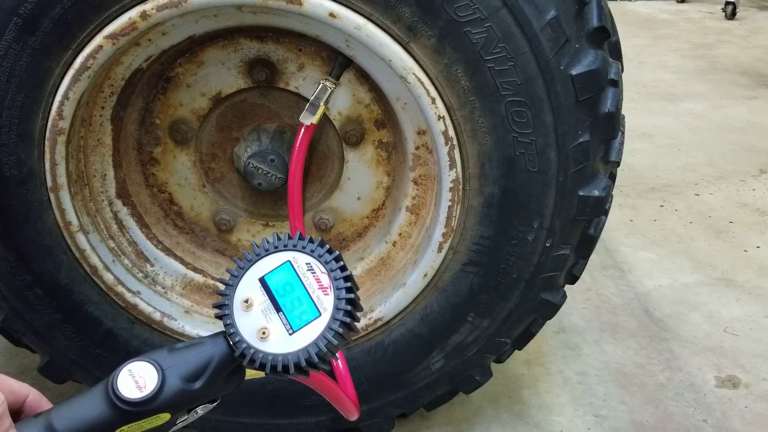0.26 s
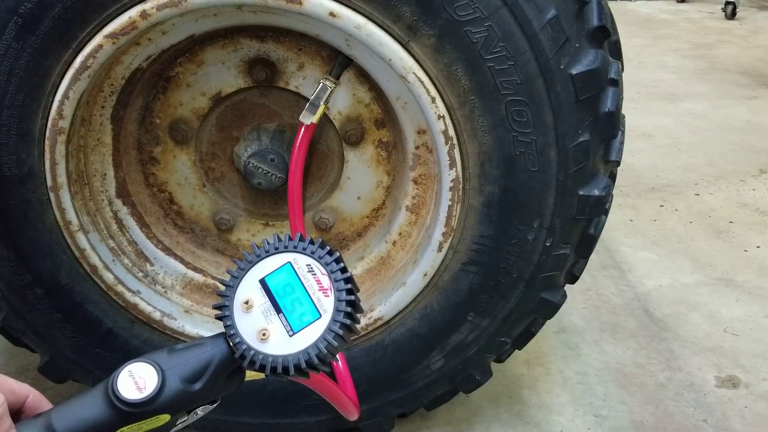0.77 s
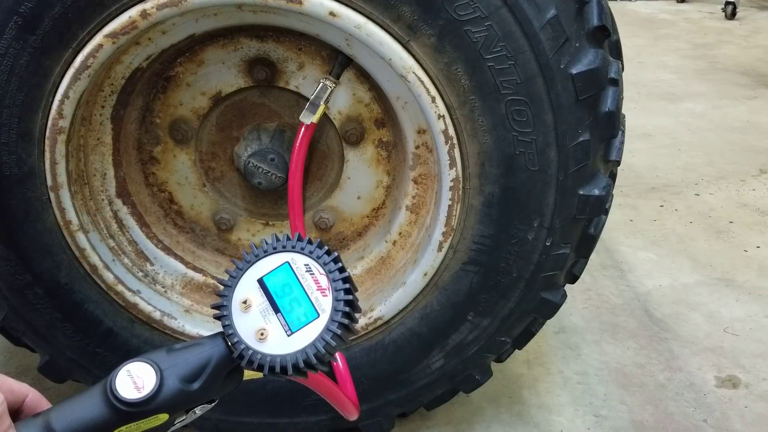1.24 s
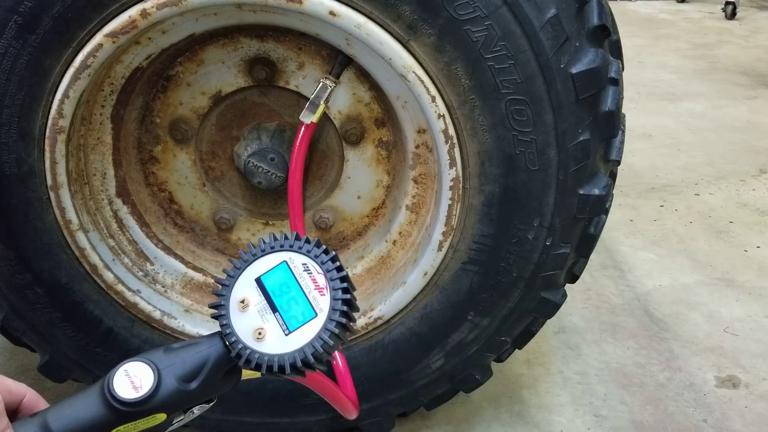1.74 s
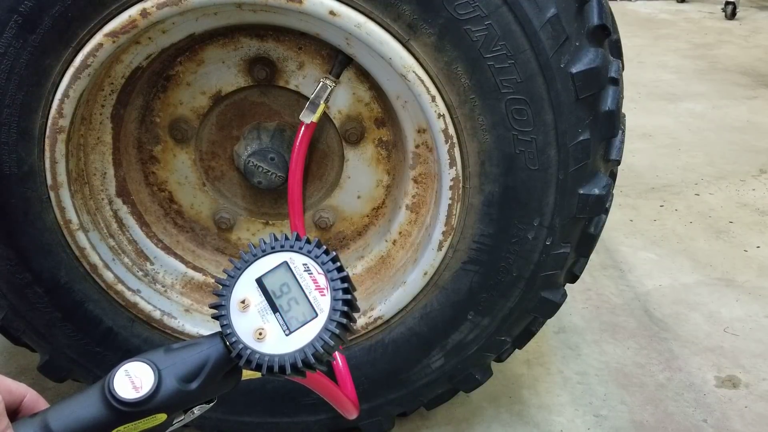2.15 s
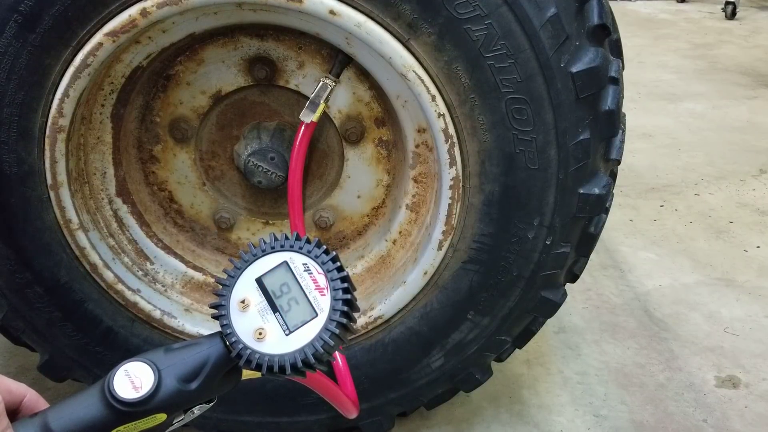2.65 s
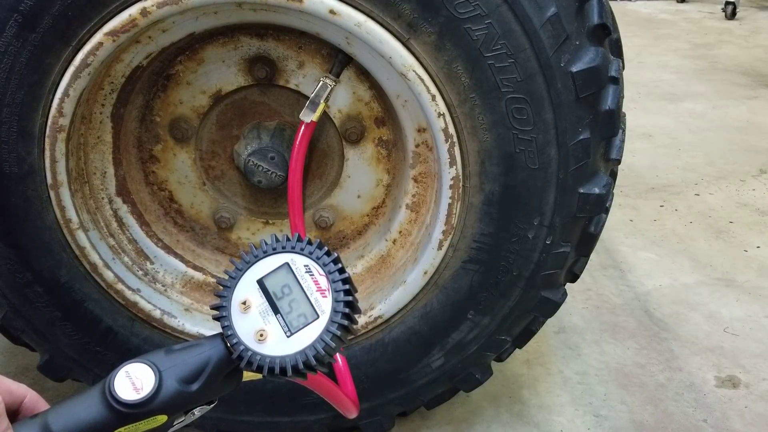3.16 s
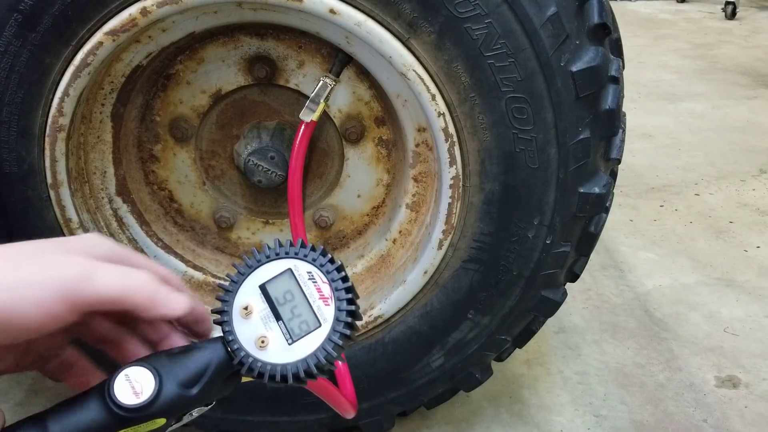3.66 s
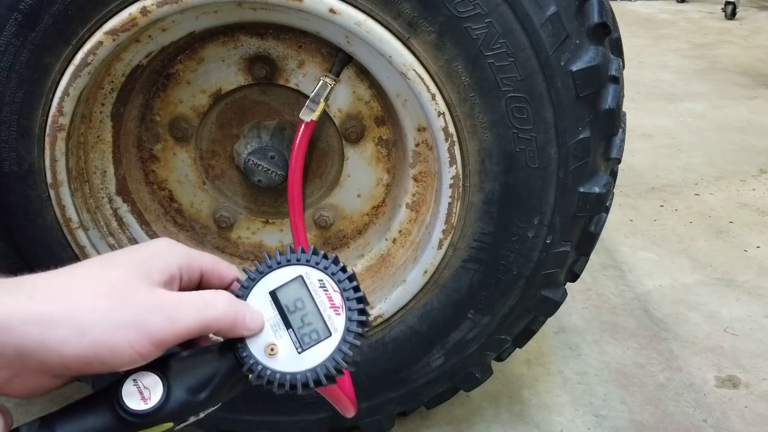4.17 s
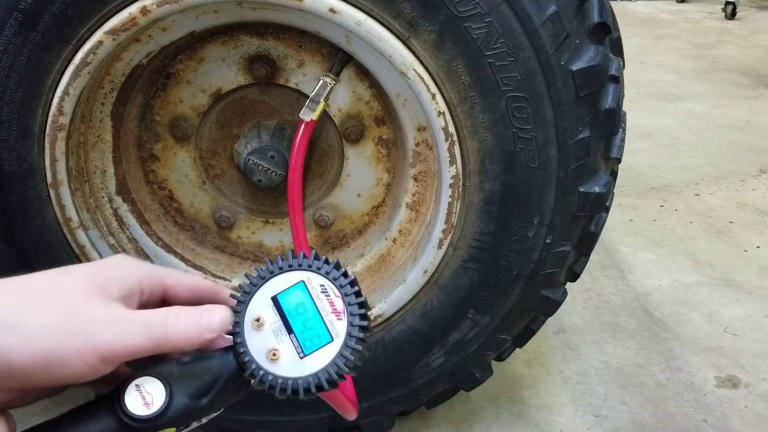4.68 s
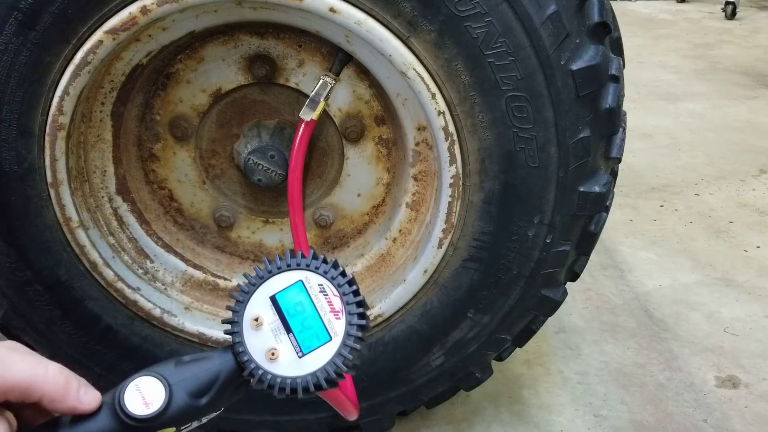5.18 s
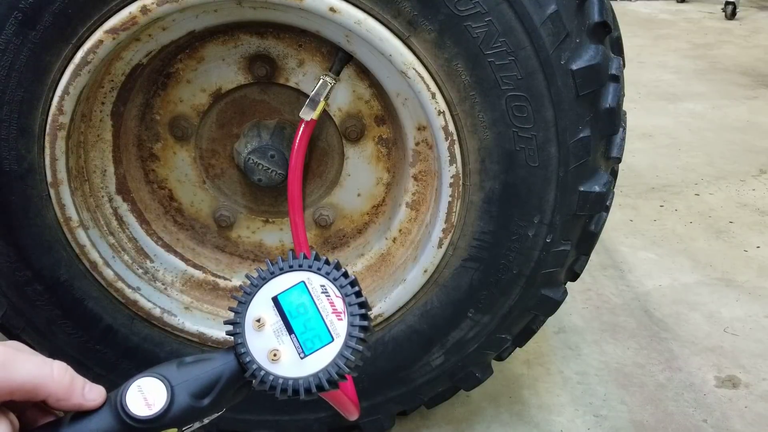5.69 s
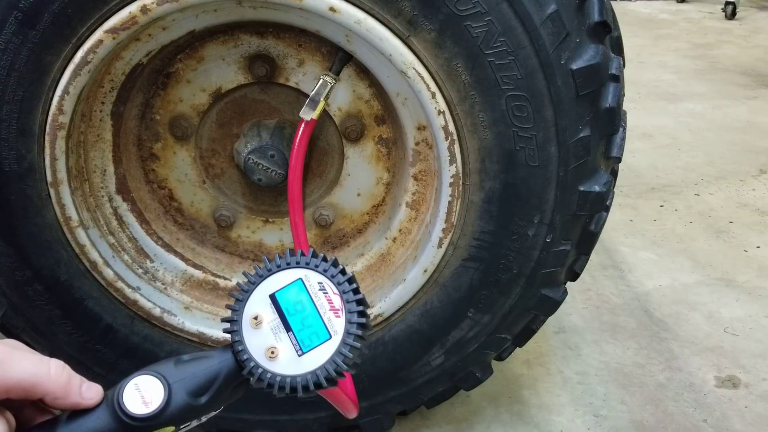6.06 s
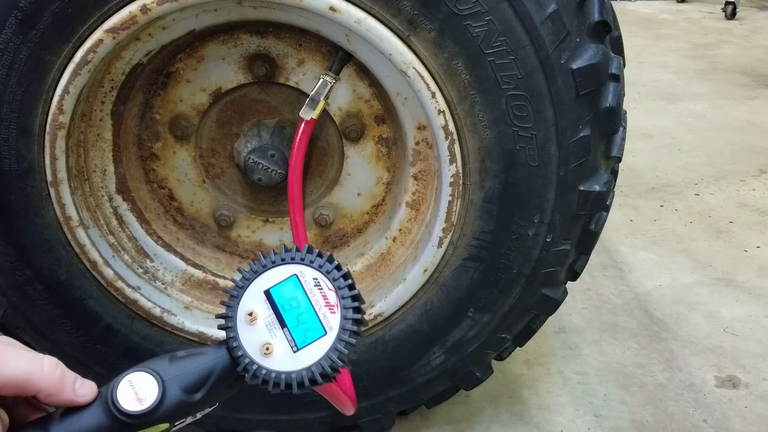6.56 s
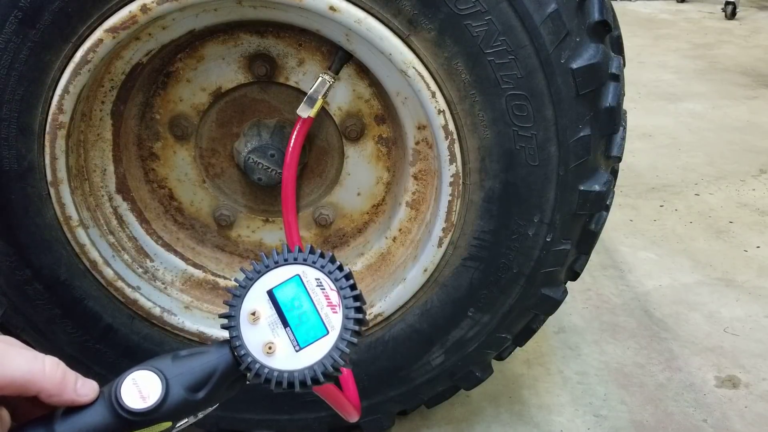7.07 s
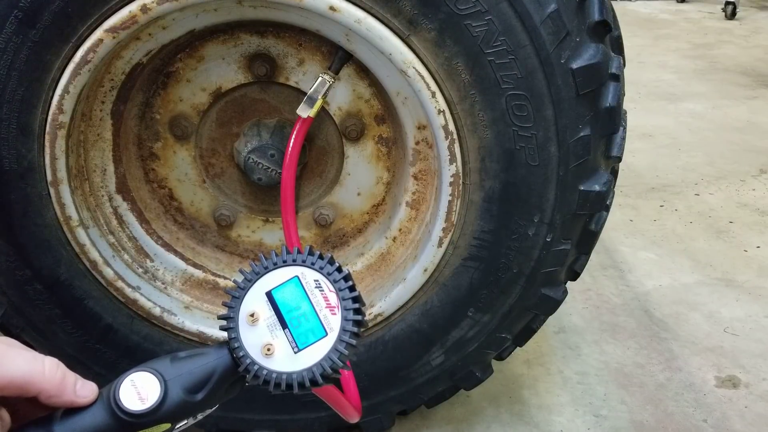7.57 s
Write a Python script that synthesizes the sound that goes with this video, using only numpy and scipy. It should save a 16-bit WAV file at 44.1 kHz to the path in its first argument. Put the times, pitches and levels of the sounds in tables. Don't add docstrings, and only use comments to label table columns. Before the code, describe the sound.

Close stereo pickup of a tire being filled: an even, high airy hiss, wide between left and right, with many soft metallic whistling resonances and very slight sagging in level. Quiet machine drone and electrical hum sit far below. After almost seven seconds the flow stops and the hose vents in one brief, sharp, bright blast with small valve clicks, followed by a diffuse tail in a hard-walled workshop.

```python
import sys
import numpy as np
from scipy import signal
from scipy.fft import rfft, irfft
from scipy.io import wavfile

SR = 44100
rng = np.random.default_rng(int(sys.argv[2]) if len(sys.argv) > 2 else 0)


def natural_amplitude(level_db):
    exponent = np.asarray(level_db, float) / 20
    return 10 ** exponent


def waveform_to_disk(signal):
    frames = np.transpose(np.atleast_2d(signal))
    scaled = np.clip(frames, -1, 1) * 32767
    samples = np.round(scaled).astype(np.int16)
    wavfile.write(sys.argv[1], SR, samples)


N = 345170
TIME = np.arange(N) / SR
HZ = np.arange(N // 2 + 1) * SR / N + 1e-3

# f/Hz, left level/dB, right level/dB
HISS_COLOUR = [(620, -94, -95), (820, -92.5, -93.5), (1400, -91, -93), (1950, -88, -90), (2550, -83, -84.5),
               (3250, -80.5, -83.5), (3800, -69.8, -72.5), (4300, -74.3, -76), (5600, -71.5, -76.5),
               (6500, -68.5, -75.5), (7800, -69, -75.5), (8600, -77.5, -79), (10000, -74.5, -77.5),
               (15500, -72, -79)]
# f/Hz, width/Hz, left rise over hiss/dB, right rise/dB,
# # left-right likeness (-1 to 1)
MODES_BELOW_2K = [(744, 20, 5, 9, 0.5), (878, 40, 10, 10, 0.7), (942, 55, 14, 14, 0.7), (1038, 34, 15, 11, 0.3),
                  (1126, 7, 12, 10, -0.5), (1172, 16, 14, 14, 0.3), (1230, 22, 12, 14, -0.6),
                  (1389, 19, 12, 14, 0), (1569, 19, 18, 15, 0.2), (1639, 16, 20, 20, 0.5),
                  (1719, 10, 17, 17, 0.6), (1755, 27, 16, 15, 0), (1824, 14, 10, 10, 0.1),
                  (1897, 14, 14, 11, -0.2)]
MODES_2K_TO_3K3 = [(2074, 15, 16, 15, 0.5), (2111, 7, 12, 13, 0.2), (2139, 5, 16, 11, 0.5),
                   (2211, 57, 12, 8, 0.2), (2267, 17, 16, 8, 0.3), (2348, 17, 22, 18, -0.1),
                   (2474, 16, 15, 14, 0.5), (2573, 11, 16, 14, 0), (2735, 14, 14, 14, 0.4),
                   (2817, 26, 10, 7, 0.5), (2928, 49, 9, 10, 0.5), (3054, 14, 17, 18, 0.8),
                   (3108, 29, 9, 9, 0.4), (3205, 22, 9, 9, 0.3)]
MODES_3K3_TO_5K8 = [(3355, 37, 7, 10, 0.1), (3403, 16, 15, 12, 0.2), (3438, 17, 10, 9, 0.1),
                    (3482, 14, 5, 12, 0.1), (3577, 39, 7, 6, 0), (3836, 7, 8, 9, 0.2), (3995, 13, 11, 8, 0.7),
                    (4073, 34, 13, 10, 0.6), (4185, 16, 9, 6, 0.4), (4356, 26, 7, 6, 0.3), (4500, 21, 8, 5, -0.2),
                    (5160, 15, 12, 14, 0.3), (5200, 12, 12, 12, 0.4), (5687, 11, 8, 7, 0.5)]
MODES_5K8_TO_8K = [(5858, 14, 7, 8, -0.6), (5995, 25, 10, 8, -0.1), (6105, 25, 8, 2, 0.2),
                   (6481, 77, 9, 5, -0.5), (6544, 105, 9, 4, -0.3), (7111, 30, 7, 3, -0.2),
                   (7197, 14, 12, 4, -0.5), (7437, 26, 8, 3, 0.1), (7599, 19, 1, 9, 0.3), (7842, 97, 5, 3, -0.5),
                   (7921, 24, 6, 9, -0.2), (7961, 15, 7, 10, -0.7)]
MODES_ABOVE_8K = [(8023, 32, 5, 8, -0.5), (8881, 68, 2, 7, 0.1), (9071, 36, 10, 0, -0.3),
                  (9714, 47, 11, 9, -0.6), (9781, 46, 9, 7, -0.4), (10902, 112, 4, 2, 0.3),
                  (11602, 94, 3, 4, 0), (12186, 79, 4, 2, 0.3), (12650, 126, 0, 5, -0.3), (13802, 32, 3, 6, 0),
                  (14992, 44, 6, 0, 0.1)]
# f/Hz, likeness (-1 to 1)
LIKENESS = [(60, 1), (130, 0.97), (290, 0.6), (640, 0.65), (1410, 1), (3100, 0.075), (6820, -0.35),
            (15000, 0.0076)]
# f/Hz, level/dB
VENT_COLOUR = [(35, -60.5), (60, -32), (500, -29), (750, -35), (1000, -28.5), (1750, -23), (2900, -16),
               (3500, -8.5), (4200, -4.5), (5800, -8.5), (7200, -4), (8600, -20), (9800, -3), (15700, -3.5)]
# f/Hz, left over right level/dB
VENT_SIDE = [(60, 7.0), (200, 4.5), (380, 7.2), (1290, 4.0), (2380, 6.0), (4400, 4.5), (7200, 7.5),
             (8600, 1.5), (15000, 10.9)]
# t/s, rise/dB, length/s
SPURTS = [
    (6.803, 2, .002),
    (6.813, 5, .002),
    (6.822, 3, .003),
    (6.87, 3.5, .003),
    (6.897, 2.5, .015),
]
# t/s, peak level/dB, f/Hz, decay/s
KNOCKS = [
    (6.795, -48.5, 80.5, .012),
    (6.863, -52, 218, .010),
    (6.85, -51.5, 480, .012),
]
# f/Hz, time to fall by 60 dB/s, level/dB
ROOM_ECHO = [(125, .9, -15), (500, 0.97, -3), (1000, 0.87, 7), (2000, 0.86, 3.5), (3800, 0.83, -0.5),
             (5250, 0.7, -0.5), (7300, 0.53, -2.5), (8500, 0.5, 1.5), (10000, 0.43, -10),
             (13000, 0.3, -5.5)]
# f/Hz, left level/dB, right level/dB
RUMBLE_COLOUR = [(15, -105, -105), (30, -88.5, -96), (60, -81.5, -86.5), (113, -82, -82),
                 (180.4, -86, -94.5), (400, -110, -114)]
# f/Hz, left level/dB, right level/dB
DRONE_COLOUR = [(100.5, -110, -114), (200, -84, -91), (320, -79, -87), (455, -89, -97.5), (502, -80.5, -81),
                (520, -96, -102), (1205, -115, -115)]
# f/Hz, level/dB
HUM = [(120, -65), (240, -67.5), (360, -72), (480, -75)]

LEVER_SHUT_S, VENT_OPEN_S, SHOP_FADE_OUT_S = 6.8, 6.797, 6.79
FADE_IN_S = 0.46


def filling():
    colour = natural_amplitude(at_hz(HISS_COLOUR)) / np.sqrt(1 + (500 / HZ) ** 8)
    ripple = reflections(ripple_db=2.1 / (1 + (2500 / HZ) ** 4), span_s=.011)
    hiss = colour * ripple * white(at_hz(LIKENESS)[0])
    sound = level_to(hiss + ringing(colour), 1200, 15500)
    sag_db = 0.24 * TIME
    fade_in_db = 4.5 * (1 - ramp(0, FADE_IN_S))
    shut_db = 904 * since(LEVER_SHUT_S)
    flutter_db = 0.13 * drift(7.8) + 0.15 * drift(69.0) + 0.11 * drift(.6)
    return natural_amplitude(-32 - sag_db - fade_in_db - shut_db + flutter_db) * sound


def ringing(colour):
    out = np.zeros((2, len(HZ)), complex)
    shared = .8
    every_mode = MODES_BELOW_2K + MODES_2K_TO_3K3 + MODES_3K3_TO_5K8 + MODES_5K8_TO_8K + MODES_ABOVE_8K + faint_modes(count=16)
    for hz, width, left_db, right_db, alike in every_mode:
        near = slice(*np.searchsorted(HZ, [hz - 12 * width, hz + 12 * width]))
        real, imag = rng.standard_normal((2, 2, near.stop - near.start))
        one, other = (real + 1j * imag) * np.sqrt(N / 2)
        angle = np.arccos(np.clip(alike / shared, -1, 1))
        lag = np.exp(1j * rng.choice([-1, 1]) * angle)
        second = lag * (shared * one + np.sqrt(1 - shared ** 2) * other)
        drive = np.array([one, second])
        height = np.sqrt(natural_amplitude([[left_db], [right_db]]) ** 2 - 1)
        resonance = 1 / (1 + 1.3j * (HZ[near] - hz) / width) ** 2
        out[:, near] += height * drive * resonance
    return colour * out


def faint_modes(count):
    low_hz, high_hz, top_rise_db = 3600, 8580, 5.5
    spread, width, left, right, alike = rng.random((count, 5)).T
    hz = low_hz * (high_hz / low_hz) ** ((np.arange(count) + spread) / count)
    width_hz = .004 * hz * (.3 + width)
    left_db = top_rise_db * (left + 1) / 2
    right_db = top_rise_db * (right + 1) / 2
    return list(zip(hz, width_hz, left_db, right_db, alike - .5))


def reflections(ripple_db, span_s):
    ripple = rfft(rng.standard_normal((2, N)) * np.exp(-TIME / span_s)).real
    return natural_amplitude(ripple_db * ripple / ripple.std())


def vent():
    colour = natural_amplitude(at_hz(VENT_COLOUR) + at_hz(VENT_SIDE) * [[.5], [-.5]])
    ripple = reflections(ripple_db=.9, span_s=.0015)
    jet = level_to(colour * ripple * white(.03), 9000, 15500)
    treble = irfft(rfft(jet) / (1 + (8600 / HZ) ** 8), N)
    open_s = np.minimum(since(VENT_OPEN_S), .4)
    jet = jet - treble + natural_amplitude(2 - 35 * open_s) * treble

    hold_s, sag_db_per_s, release_db_per_s = 0.1, 13, 221.5
    level_db = -21.5 - sag_db_per_s * open_s - release_db_per_s * since(VENT_OPEN_S + hold_s)
    for start_s, rise_db, length_s in SPURTS:
        level_db = level_db + rise_db * np.exp(-((TIME - start_s) / length_s) ** 2)
    swing_db = -6.5 * ramp(6.865, .035) * np.array([[.5], [-.5]])
    sputter_db = .8 * drift(120.0) + 1.5 * drift(900.0)
    return ramp(VENT_OPEN_S, .006) * natural_amplitude(level_db + swing_db + sputter_db) * jet


def knocks():
    out = 0
    for start_s, db, hz, decay_s in KNOCKS:
        t = since(start_s)
        out = out + natural_amplitude(db) * np.sin(2 * np.pi * hz * t) * np.exp(-t / decay_s)
    return out


def room(x):
    tail = 0
    t = TIME[:2 * SR]
    centres = np.array(ROOM_ECHO)[:, 0]
    noise = white(.9 / (1 + (HZ / 500) ** 2))
    for k, (hz, t60, level_db) in enumerate(ROOM_ECHO):
        share = np.interp(np.log(HZ), np.log(centres), np.arange(len(ROOM_ECHO)) == k)
        decay = natural_amplitude(-60 * t / t60) * (1 - np.exp(-t / 0.033))
        band = irfft(share * noise, N)[:, :len(t)]
        tail = tail + natural_amplitude(level_db) * decay / np.linalg.norm(decay) * band
    return signal.fftconvolve(x, tail, axes=1)[:, :N]


def shop():
    rise_db = -8.5 * (1 - ramp(.1, FADE_IN_S))
    gone_s, swell_db = since(SHOP_FADE_OUT_S), 1.15
    rumble_fade_db = np.maximum(-45.5 * gone_s, -34)
    drone_fade_db = np.maximum(-53.5 * gone_s, -17 - 7 * gone_s)
    low = natural_amplitude(-59 + rise_db + swell_db * drift(3.0) + rumble_fade_db)
    high = natural_amplitude(-65 + 0.27 * rise_db + swell_db * drift(3.0) + drone_fade_db)

    rumble = level_to(natural_amplitude(at_hz(RUMBLE_COLOUR)) * white(at_hz(LIKENESS)[0]), 30, 200)
    drone = level_to(natural_amplitude(at_hz(DRONE_COLOUR)) * white(at_hz(LIKENESS)[0]), 200, 520)
    hum = 0
    for hz, db in HUM:
        tone = np.sin(2 * np.pi * hz * TIME + .9 * drift(0.93))
        hum = hum + natural_amplitude(db + 60.5 + 2.0 * drift(4.0)) * tone
    hum = hum * natural_amplitude([[2.2], [-2.2]])
    return low * (0.76 * rumble + hum) + 1.11 * high * drone


def at_hz(rows):
    f, *columns = np.transpose(rows)
    return np.array([np.interp(np.log(HZ), np.log(f), c) for c in columns])


def white(alike):
    mid, side = rfft(rng.standard_normal((2, N)))
    alike = np.clip(alike, -1, 1)
    return np.sqrt(.5 + .5 * alike) * mid + np.sqrt(.5 - .5 * alike) * side * [[1], [-1]]


def level_to(spectra, low, high):
    band = spectra.mean(axis=0)[(HZ > low) & (HZ < high)]
    return irfft(spectra, N) * N / np.sqrt(2 * np.sum(np.abs(band) ** 2))


def drift(rate_hz):
    slow = irfft(rfft(rng.standard_normal(N)) / (1 + (HZ / rate_hz) ** 2), N)
    return slow / slow.std()


def ramp(start_s, length_s):
    return np.clip((TIME - start_s) / length_s, 0, 1)


def since(start_s):
    return np.maximum(TIME - start_s, 0)


def scene():
    hiss, blast = filling(), vent()
    spread = 0.84 * blast + 0.14 * blast[::-1]
    after = ramp(LEVER_SHUT_S, .021)
    hiss_tail = after * natural_amplitude(-5.5) * room(hiss)
    return hiss + blast + room(spread) + hiss_tail + knocks() + shop()


def roll_off(x):
    return signal.sosfilt(signal.butter(12, 15740, fs=SR, output="sos"), x)


def record(dry):
    rounded = .95 * np.tanh(dry / .95)
    low_pass = signal.ellip(12, .3, 70, 15740, fs=SR, output="sos")
    mix = signal.sosfilt(low_pass, rounded)
    return roll_off(mix)


dry = scene()
out = record(dry)
waveform_to_disk(out)
```